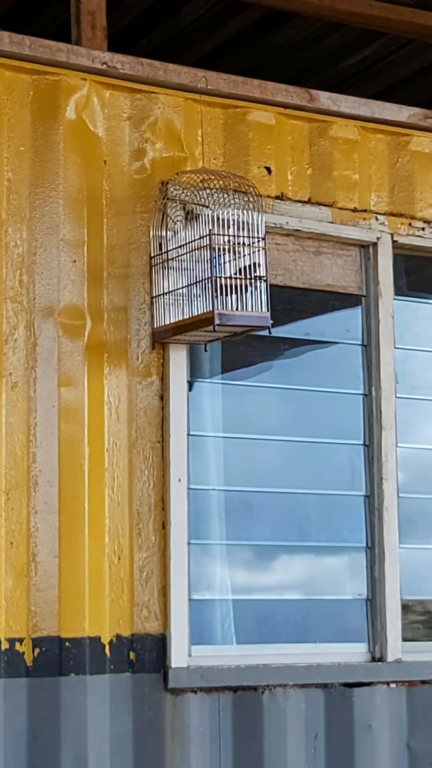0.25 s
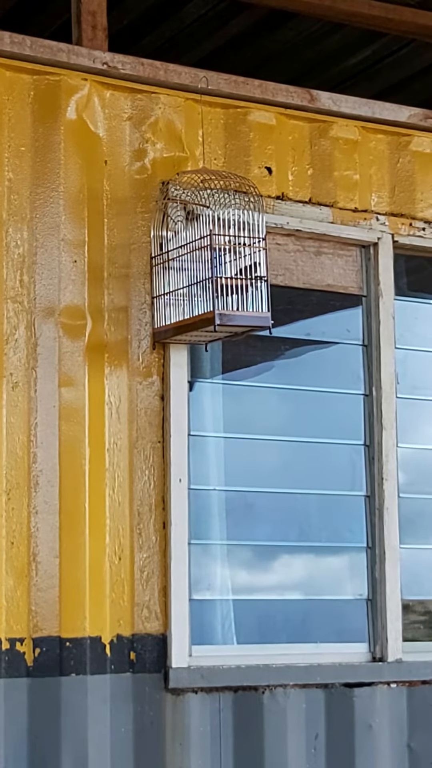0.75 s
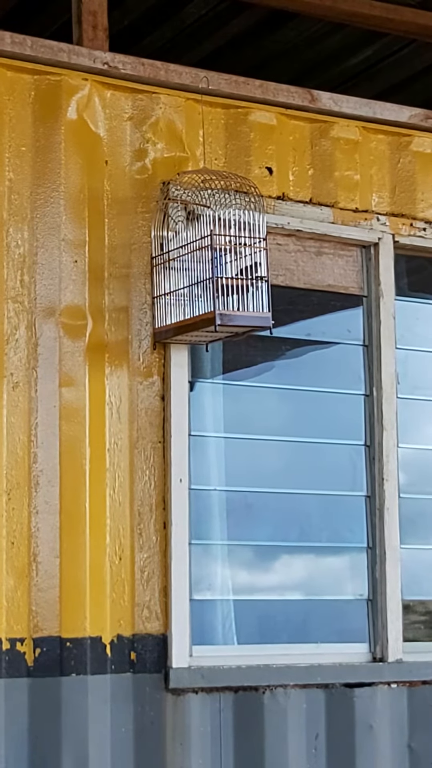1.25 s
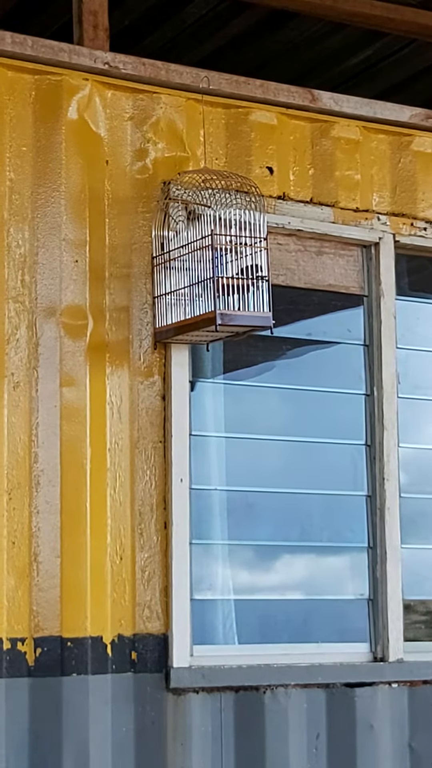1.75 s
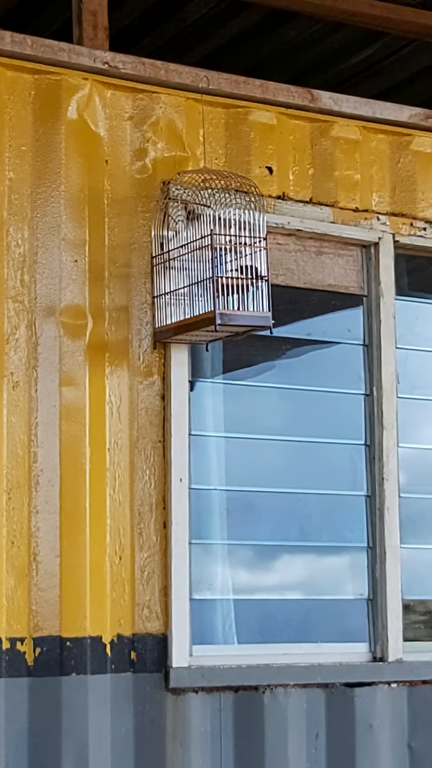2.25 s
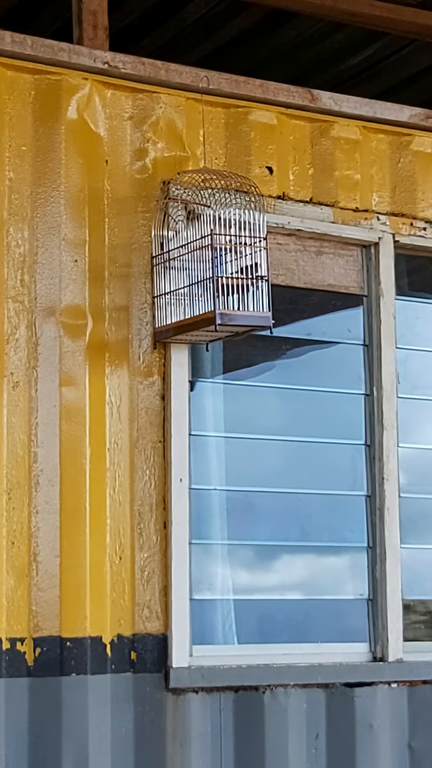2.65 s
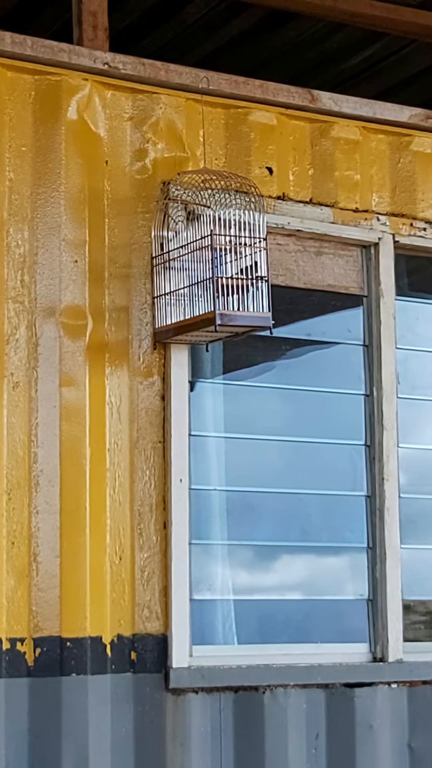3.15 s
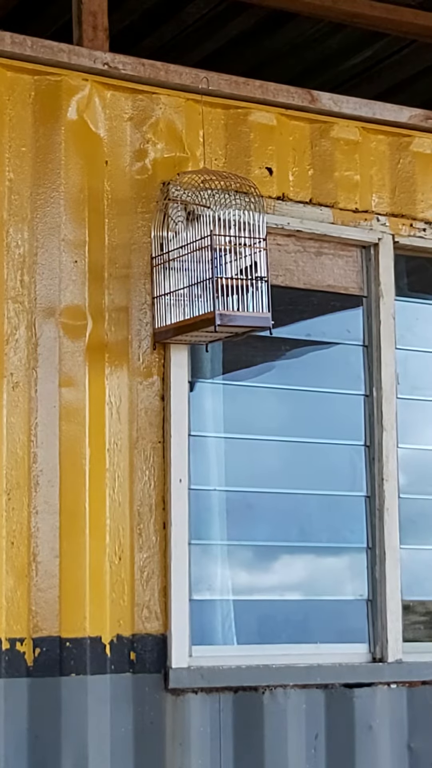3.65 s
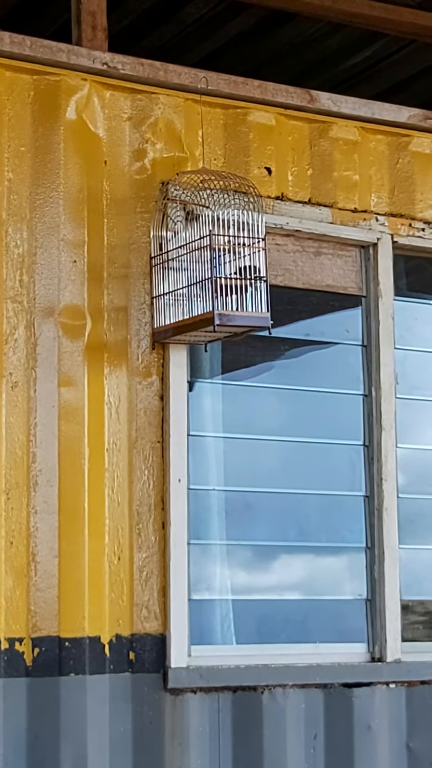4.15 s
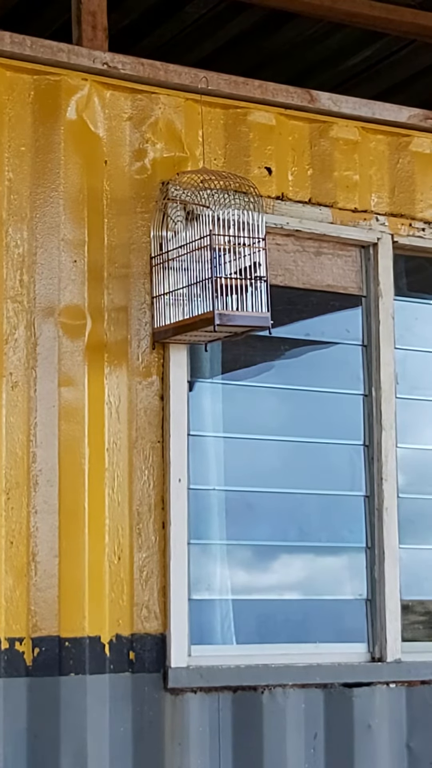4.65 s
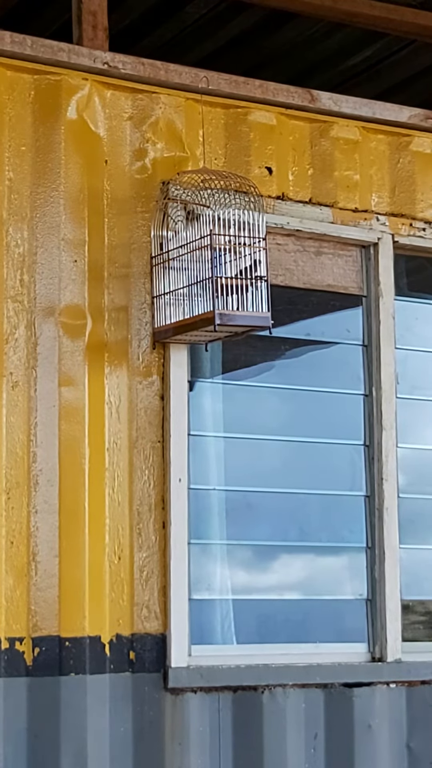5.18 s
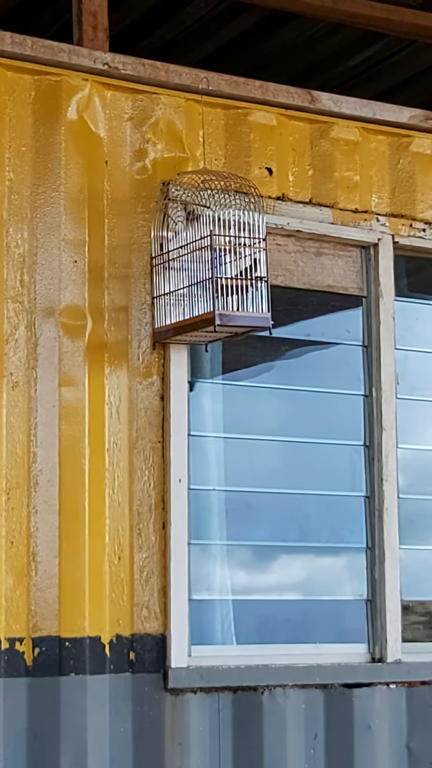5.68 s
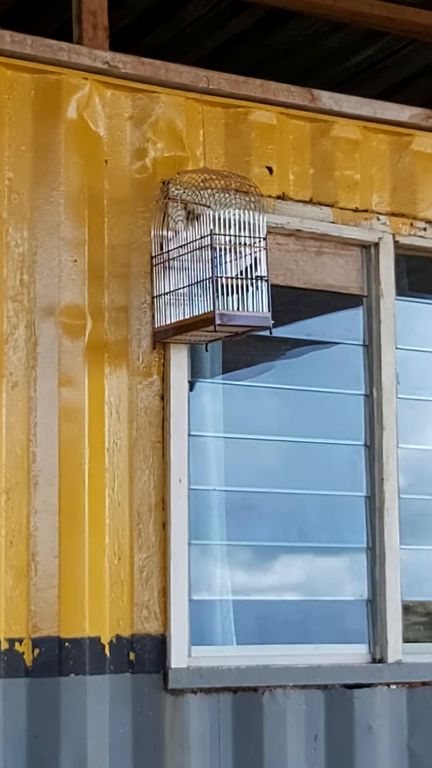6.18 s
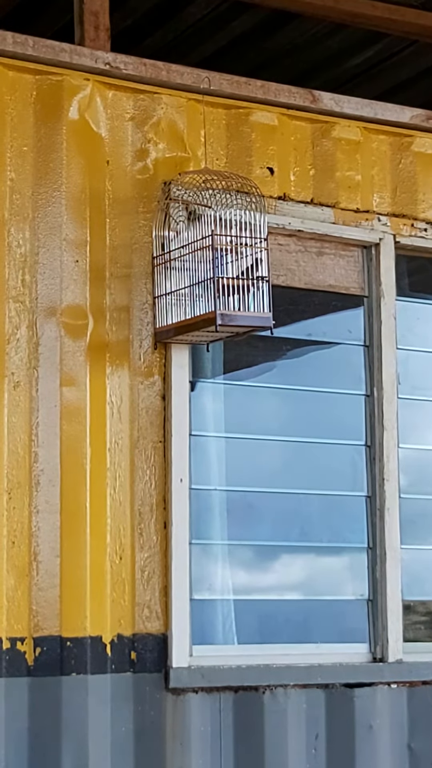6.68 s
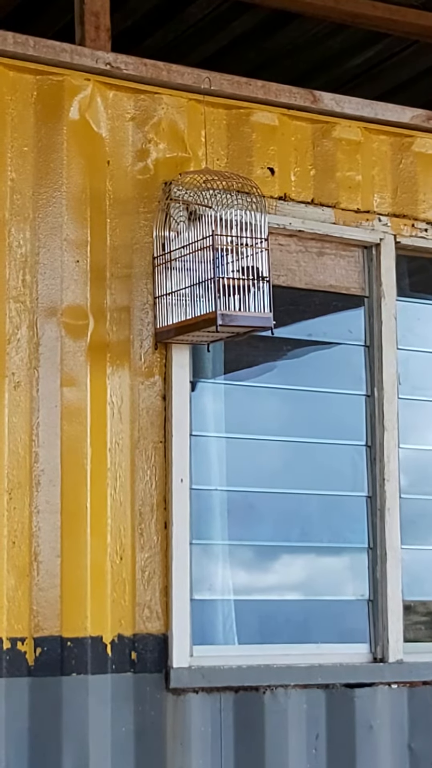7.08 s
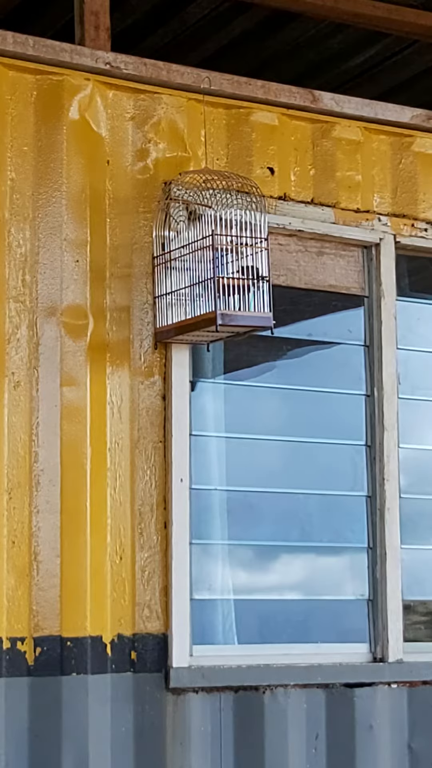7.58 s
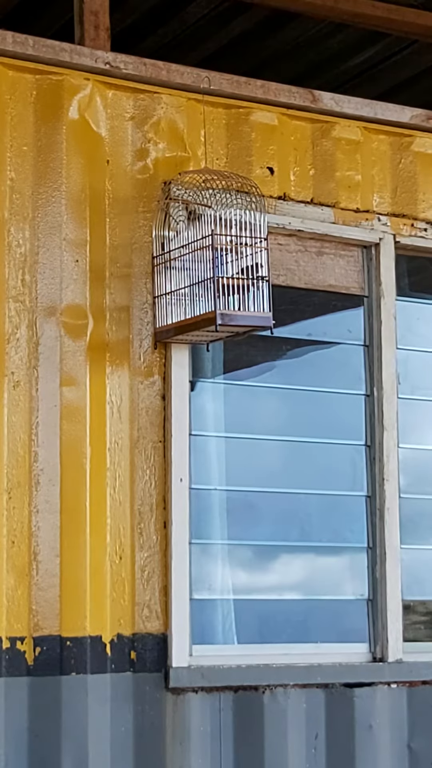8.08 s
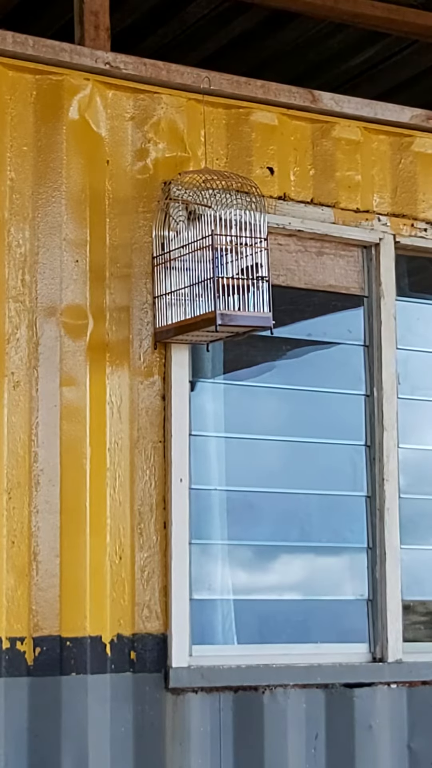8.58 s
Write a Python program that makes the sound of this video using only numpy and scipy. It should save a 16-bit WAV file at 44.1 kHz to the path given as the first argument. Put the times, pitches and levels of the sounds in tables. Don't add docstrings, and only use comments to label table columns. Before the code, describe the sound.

Low, constant engine hum with a faint casing hiss under everything. Dry bristle strokes come and go, grit ticks, and tools knock dully. Blurred far-off bird chips fade out before four seconds. Then a nearby small bird gives a few soft high whistles and a burst of clear upward sweeps, the last three slower and softer, ringing between metal walls. A low thud follows, then sweeping and clatter. Phone stereo pickup, right-heavy, its level dipping slightly under the song.

```python
import sys
import numpy as np
from scipy import signal
from scipy.fft import rfft, irfft, next_fast_len
from scipy.io import wavfile
from scipy.ndimage import uniform_filter1d

SR = 44100
rng = np.random.default_rng(int(sys.argv[2]) if len(sys.argv) > 2 else 0)


def wav_record(signal):
    frames = np.transpose(np.atleast_2d(signal))
    bounded = np.clip(frames, -1, 1)
    quanta = np.round(bounded * 32767).astype(np.int16)
    wavfile.write(sys.argv[1], SR, quanta)


def gain_from_db(level_db):
    decades = np.asarray(level_db, float) / 20
    return 10 ** decades


N = 389403
T = np.arange(N) / SR
RIGHT_LAG = 5

# f/Hz, level/dB
LEFT_PORT = [(60, -5.5), (110, -3.0), (200, -4.5), (380, -5.5), (700, -4.0), (1290, -8.5), (2380, -12.5),
             (4400, -3.5), (8120, -6.5), (15000, -6.0)]
# f/Hz, likeness (clipped to 0-1)
LIKENESS = [(60, 1), (130, 0.8), (290, 0.45), (640, 0.8), (1410, -1.2), (3100, -0.04), (6820, -2.06),
            (15000, -2)]
# start t/s, length t/s, first f/Hz, crest f/Hz, level/dB
STEEP_SWEEPS = [
    (5.122, .132, 3900, 5960, -17),
    (5.322, .155, 3280, 6070, -18),
]
SLOW_SWEEPS = [
    (6.01, .185, 2800, 4710, -21.5),
    (6.271, .188, 2770, 4780, -22.5),
    (6.561, .21, 2790, 4510, -22.5),
]


def at_hz(points, hz):
    points = np.array(points)
    return np.interp(np.log(hz + 1), np.log(points[:, 0]), points[:, 1])


def coloured(x, gain_of_hz):
    size = next_fast_len(x.shape[-1])
    gain = gain_of_hz(np.fft.rfftfreq(size, 1 / SR))
    return irfft(rfft(x, size) * gain, size)[..., :x.shape[-1]]


def drift(rate):
    slow = coloured(rng.standard_normal(N), lambda hz: 1 / (1 + (hz / rate) ** 2))
    return slow / slow.std()


def port_noise(spectrum):
    mid, side = rng.standard_normal((2, N)) * np.sqrt(SR / 4)

    def alike(hz):
        return np.clip(at_hz(LIKENESS, hz), 0, 1)

    mid = coloured(mid, lambda hz: gain_from_db(at_hz(spectrum, hz)) * np.sqrt(1 + alike(hz)))
    side = coloured(side, lambda hz: gain_from_db(at_hz(spectrum, hz)) * np.sqrt(1 - alike(hz)))
    left = coloured(mid + side, lambda hz: gain_from_db(at_hz(LEFT_PORT, hz)))
    return np.array([left, mid - side])


def yard(x):
    early_t60_s, early_db = 0.13, 3.5
    late_t60_s, late_db = 0.47, 2.5
    t = np.arange(SR) / SR
    early, late = rng.standard_normal((2, 2, SR))
    early *= gain_from_db(-60 * t / early_t60_s) * (t > .001)
    late *= gain_from_db(-60 * t / late_t60_s) * np.minimum(t / 0.01, 1)
    echoes = gain_from_db(early_db) * early / np.linalg.norm(early[0])
    echoes += gain_from_db(late_db) * late / np.linalg.norm(late[0])
    echoes[[0, 1], [0, RIGHT_LAG]] += 1
    return signal.fftconvolve(x[None], echoes, axes=1)[:, :N]


def generator():
    # multiple of the cycle rate, left level/dB, right level/dB
    main_orders = [(4, -31, -25), (6, -45, -43), (7, -34, -32), (8, -44, -39), (12, -40, -36),
                   (13, -57, -51), (16, -59, -54), (18, -66, -54), (19, -60, -59), (20, -57, -53),
                   (21, -66, -56), (22, -60, -62), (24, -72, -62), (26, -62, -68), (32, -67, -52),
                   (33, -59, -68), (34, -54, -54), (37, -70, -59), (38, -79, -62), (40, -70, -62),
                   (41, -70, -61), (42, -61, -76), (44, -61, -58), (52, -69, -62), (62, -70, -59),
                   (65, -68, -63), (73, -72, -60)]
    # multiple of the cycle rate, right level/dB
    high_orders = [
        (56, -61),
        (85, -67),
        (89, -67),
        (103, -64),
        (116, -63),
        (128, -64),
        (141, -64),
        (145, -57.5),
    ]
    # f/Hz, density level/dB
    rumble = [(25, -66.5), (40, -90.5), (55, -48.5), (85, -59), (112, -46), (135, -55.5), (175, -60),
              (220, -65), (280, -66.5), (340, -74.5), (500, -75.5), (1000, -75), (1300, -81.5),
              (1500, -106.5)]
    # f/Hz, density level/dB
    casing = [(1000, -97.5), (1300, -85.5), (1640, -75), (1900, -80), (2220, -75), (2600, -83.5),
              (3300, -93), (3800, -91), (4500, -100), (6200, -94.5), (7400, -88.5), (8800, -102),
              (12000, -107), (15600, -116)]
    # f/Hz, width f/Hz, left level/dB, right level/dB
    panels = [
        (520, 12, -58, -60),
        (1114, 30, -70, -61),
        (2218, 60, -75, -60),
        (171, 8, -54, -51),
    ]
    cycle_hz, minor_db, high_left_db = 15.2913, -78, -20

    cycle = 2 * np.pi * np.cumsum(cycle_hz * (1 + .0005 * drift(.4))) / SR
    levels = minor_db + rng.normal(0, 4, (150, 2))
    for order, right_db in high_orders:
        levels[order] = right_db + high_left_db, right_db
    for order, left_db, right_db in main_orders:
        levels[order] = left_db, right_db
    starts = rng.uniform(0, 2 * np.pi, len(levels))
    turn = np.arange(4097) / 4096 * 2 * np.pi
    partials = np.sin(np.arange(9, len(levels))[:, None] * turn + starts[9:, None])
    waves = np.sqrt(2) * gain_from_db(levels[9:].T) @ partials
    out = np.array([np.interp(cycle % (2 * np.pi), turn, wave) for wave in waves])
    for order in (4, 6, 7, 8):
        out += np.sqrt(2) * gain_from_db(levels[order, :, None]) * np.sin(order * cycle + starts[order])
    out += port_noise(rumble)
    throb_db = 0.57 * np.sin(2 * cycle) + 0.5 * np.sin(8 * cycle)
    out += port_noise(casing) * gain_from_db(drift(0.97) + throb_db)
    for hz, width, left_db, right_db in panels:
        ring = signal.lfilter(*signal.iirpeak(hz, hz / width, SR), rng.standard_normal(N))
        out += ring / ring.std() * gain_from_db([[left_db], [right_db]])
    return out


def ticks():
    # t/s, peak level/dB, lowest f/Hz
    tick_events = [
        (.002, -31, 5000),
        (1.153, -41, 5000),
        (2.548, -27, 9000),
        (2.83, -51, 6000),
        (3.835, -44, 6000),
        (4.428, -30, 2500),
        (6.385, -31, 4840),
        (7.46, -46, 5000),
    ]
    out = np.zeros((2, N))
    decay = gain_from_db(-60 * np.arange(400) / SR / .006)
    for s, peak_db, low_hz in tick_events:
        high_pass = signal.butter(4, low_hz, "high", fs=SR, output="sos")
        burst = signal.sosfilt(high_pass, rng.standard_normal((2, 400)) * decay)
        burst *= gain_from_db(peak_db) / np.abs(burst).max() * gain_from_db([[-6], [0]])
        out[:, int(s * SR):][:, :400] += burst
    return out


def broom():
    # start t/s, rise t/s, hold t/s, bristle hiss level/dB
    strokes = [(.14, 0.12, 0.34, -50.5), (.83, 0.031, .025, -55.5), (1.12, 0.097, 0.26, -50.5),
               (1.77, .03, 0.014, -61.5), (2.04, 0.18, 0.2, -50), (2.6, 0.062, .015, -63),
               (2.82, 0.023, .015, -60), (2.93, 0.093, 0.097, -51), (3.79, 0.074, 0.2, -49),
               (4.36, .03, .11, -67.5), (4.7, .12, .15, -50), (5.06, 0.036, 0.024, -56.5),
               (5.457, 0.042, 0.56, -50.5), (6.4, 0.32, 0.35, -50), (7.44, 0.031, .03, -54.5),
               (7.57, 0.13, 0.15, -51), (8.1, 0.02, 0.013, -66), (8.33, 0.47, .12, -45.5)]
    # f/Hz, level/dB
    bristles = [(1800, -5.5), (3000, -5.5), (4200, -6.5), (6500, -6), (7500, -2.5), (9200, -6), (11900, -2),
                (15600, -14.5)]
    lift_db_per_s, rest_db = 103.5, -85
    pressure = np.full(N, gain_from_db(rest_db))
    for s, rise, hold, level_db in strokes:
        lift_db = lift_db_per_s * np.maximum(T - s - rise - hold, 0)
        pressed = np.clip((T - s) / rise, 0, 1)
        pressure = np.maximum(pressure, pressed * gain_from_db(level_db - lift_db))
    slips = port_noise(bristles) * gain_from_db(0.5 * drift(27) + drift(300))
    return pressure * gain_from_db(8.0) * slips / slips[1].std()


def far_bird():
    # t/s, peak level/dB, f/Hz
    chips = [(0.7633, -39, 1790), (0.826, -34.5, 1533), (0.8914, -44, 1630), (1.0383, -35, 1628),
             (1.263, -34, 1616), (1.385, -40, 1620), (1.513, -38, 1590), (1.627, -37, 1710),
             (1.796, -39, 1640), (1.8918, -40, 1633), (2.056, -37, 1626), (2.2053, -42, 1585),
             (2.307, -33.5, 1630), (2.4423, -38, 1690), (2.5401, -46, 1600), (2.846, -45, 1570),
             (2.92, -39, 1635), (3.1173, -43, 1575), (3.1977, -43, 1600), (3.3134, -53, 1770),
             (3.493, -42, 1455), (3.706, -40, 1630)]
    # t/s, level/dB
    flock = [
        (.6, -85),
        (.9, -63),
        (2.3, -55),
        (3.6, -57.5),
        (4.0, -82),
    ]
    voice = np.zeros(N)
    t = np.arange(int(.06 * SR)) / SR
    hoarse = np.hanning(len(t)) * (1 + 0.7 * np.cos(2 * np.pi * 130 * t))
    for s, peak_db, hz in chips:
        falling = np.sin(2 * np.pi * hz * t * (1.07 - 1.2 * t))
        voice[int((s - .02) * SR):][:len(t)] += gain_from_db(peak_db - 10) * hoarse * falling
    band = signal.butter(2, [1530, 1740], "band", fs=SR, output="sos")
    blur = signal.sosfilt(band, rng.standard_normal(N))
    voice += blur / blur.std() * gain_from_db(np.interp(T, *np.transpose(flock)) + drift(6))
    return yard(voice) * gain_from_db([[-10], [0]])


def knocks():
    # t/s, peak level/dB, centre f/Hz, T60 t/s
    knock_events = [(.775, -43, 5000, .1), (.86, -38, 4000, 0.69), (1.51, -25.5, 1440, 0.64),
                    (1.529, -37, 3500, 0.24), (2.55, -37.5, 12900, 0.41), (2.67, -50, 8000, .1),
                    (3.857, -34, 2470, 0.33), (3.9, -28.5, 2480, 0.2), (5.078, -23.5, 1580, 0.4),
                    (6.996, -25.5, 218, 0.3), (7.055, -20, 119, 0.13), (6.999, -34, 607, 0.36),
                    (7.46, -47, 8000, 0.11), (8.5376, -26, 1470, 0.69), (8.6, -43, 1700, .2),
                    (8.649, -32.5, 2400, 0.81), (8.721, -30, 2320, 0.52)]
    out = np.zeros((2, N))
    for s, peak_db, hz, t60 in knock_events:
        t = np.arange(int(t60 * SR)) / SR
        band = signal.butter(2, [hz / 1.82, min(hz * 1.55, 16000)], "band", fs=SR, output="sos")
        alike = np.clip(at_hz(LIKENESS, hz), 0, 1)
        noise = rng.standard_normal((3, SR))[:, :len(t)]
        both_ports = alike * noise[0] + (1 - alike) * noise[1:]
        envelope = gain_from_db(-60 * t / t60) * np.minimum(t * hz / 6, 1)
        burst = signal.sosfilt(band, both_ports * envelope)
        burst *= gain_from_db(peak_db) / np.abs(burst).max() * gain_from_db([[at_hz(LEFT_PORT, hz)], [0]])
        first = int(s * SR)
        out[:, first:][:, :len(t)] += burst[:, :N - first]
    return out


def note(start, length, first_hz, crest_hz, level_db, shape):
    bend, crest, sag, swell, swell_db, fade, fade_db = shape
    t = np.arange(int(start * SR), int((start + length) * SR)) / SR
    done, crest = (t - start) / length, min(crest, .99)
    pitch = crest_hz - (crest_hz - first_hz) * np.clip(1 - done / crest, 0, 1) ** bend
    pitch *= 1 - sag * np.clip((done - crest) / (1 - crest), 0, 1) ** 2
    effort_db = level_db - swell_db * np.clip(1 - done / swell, 0, 1) ** 2
    effort_db -= fade_db * np.clip(1 - (1 - done) / fade, 0, 1) ** 2
    return t, pitch, effort_db


def bird():
    # start t/s, length t/s, first f/Hz, crest f/Hz, level/dB
    whistles = [
        (4.58, 0.12, 2880, 3230, -37),
        (4.678, .095, 3110, 4134, -26.5),
        (4.975, .08, 2930, 3076, -27),
    ]
    held_whistles = [
        (2.7, 0.174, 3750, 3890, -65),
        (4.283, 0.156, 3600, 3825, -40),
        (8.07, 0.078, 5730, 6050, -59),
    ]
    falling_whistles = [
        (4.648, .058, 3420, 3070, -37.5),
    ]
    low_halves = [
        (5.108, .025, 3250, 4100, -31),
        (5.558, .066, 3050, 4720, -20),
        (5.785, .064, 3040, 4520, -18),
    ]
    high_halves = [
        (5.62, .088, 4700, 5920, -18),
        (5.846, .083, 4500, 5440, -17),
    ]
    # glide bend, crest (share of length), sag (share of pitch),
    # swell (share of length), swell level/dB, fade (share of length), fade level/dB
    whistle_shape = (3.7, .55, 0.036, 0.53, 26, 0.42, 11)
    steep_shape = (1.35, .75, .05, .45, 13, .25, 17)
    low_shape = (1.8, .98, .001, .75, 19, .2, 10)
    high_shape = (3.4, .85, .04, .1, 3, .5, 11)
    slow_shape = (2.1, .85, .02, .5, 10, .45, 12)
    held_shape = (2.75, 0.35, .03, 0.4, 27, 0.44, 6.5)
    fall_shape = (1.64, 0.62, .005, 0.33, 6, 0.41, 10)
    # f/Hz, level/dB
    beak = [(2700, -8.5), (3600, -0.5), (4400, 1.5), (6000, -2.5), (8000, -6.5), (11000, 4.5),
            (13000, 10.5), (15500, 5)]
    # f/Hz, width f/Hz, level/dB
    sheets = [
        (4340, 120, 2),
        (4770, 120, 3),
        (5070, 120, 2),
        (5450, 120, 2),
    ]
    second_db, third_db, extra_direct_db, muscle_s = -33.5, -37, 4, .022

    voice = np.zeros(N)
    tremble = uniform_filter1d(drift(50), int(muscle_s * SR / 2))
    song = [(whistles, whistle_shape), (STEEP_SWEEPS, steep_shape), (low_halves, low_shape),
            (high_halves, high_shape), (SLOW_SWEEPS, slow_shape), (held_whistles, held_shape),
            (falling_whistles, fall_shape)]
    for t, pitch, level_db in (note(*row, shape) for rows, shape in song for row in rows):
        first = round(t[0] * SR)
        pitch *= 1 + .003 * tremble[first:][:len(t)]
        edges = np.clip(np.minimum(t - t[0], t[-1] - t) / 0.004, 0, 1)
        phase = 2 * np.pi * np.cumsum(pitch) / SR
        for k, partial_db in enumerate([0, second_db, third_db], 1):
            effort_db = level_db * 1.08 + 5 if k > 1 else level_db
            gain = gain_from_db(effort_db + partial_db + at_hz(beak, k * pitch))
            voice[first:][:len(t)] += gain * edges * np.sin(k * phase)
    for hz, width, boost_db in sheets:
        voice += (gain_from_db(boost_db) - 1) * signal.lfilter(*signal.iirpeak(hz, hz / width, SR), voice)
    extra_direct = gain_from_db(extra_direct_db) * voice * (T < low_halves[0][0])
    return (yard(voice) + [extra_direct, np.roll(extra_direct, RIGHT_LAG)]) * gain_from_db([[-4.5], [0]])


def scene():
    drone = generator()
    drone[1] = np.roll(drone[1], RIGHT_LAG)
    return drone + ticks() + broom() + far_bird() + knocks() + bird()


def top_cut(x):
    return signal.sosfilt(signal.butter(12, 15780, fs=SR, output="sos"), x)


def record(dry):
    duck_db, duck_s, hold_s, let_go_s = -2, 0.25, 0.92, 0.48
    loud = STEEP_SWEEPS[0][0]
    quiet = SLOW_SWEEPS[-1][0] + SLOW_SWEEPS[-1][1] + hold_s
    gain_db = duck_db * np.interp(T, [loud, loud + duck_s, quiet, quiet + let_go_s], [0, 1, 1, 0])
    return top_cut(dry * gain_from_db(gain_db))


dry = scene()
out = record(dry)
wav_record(out)
```